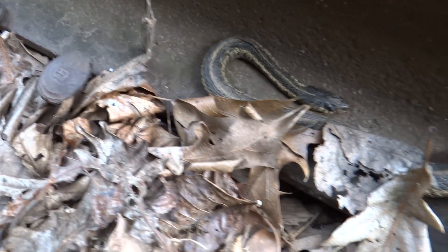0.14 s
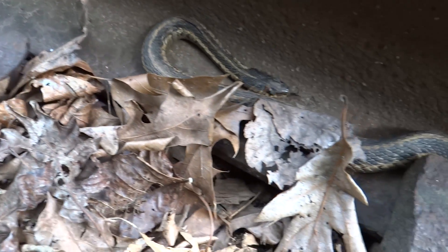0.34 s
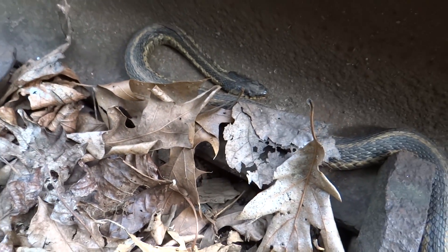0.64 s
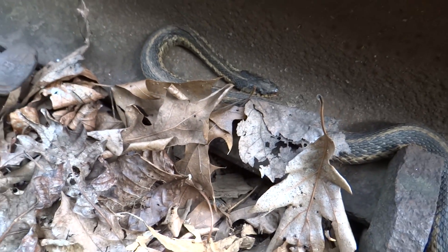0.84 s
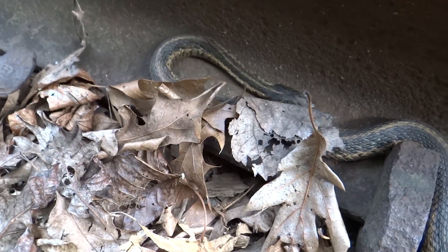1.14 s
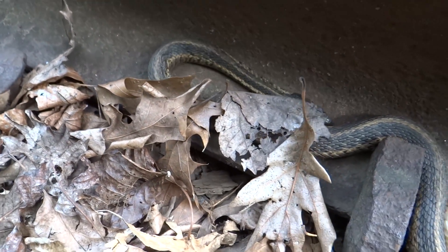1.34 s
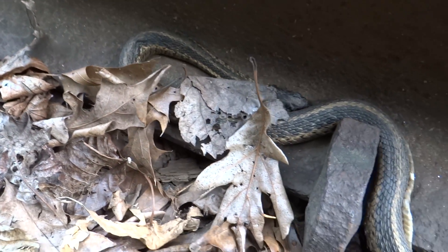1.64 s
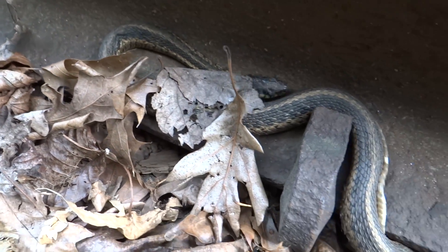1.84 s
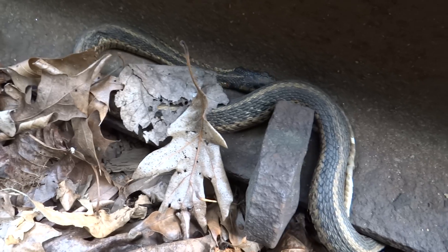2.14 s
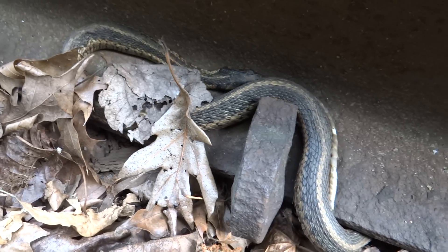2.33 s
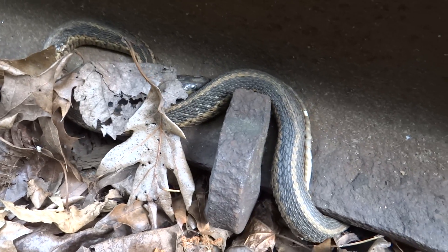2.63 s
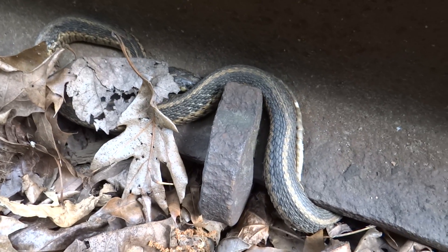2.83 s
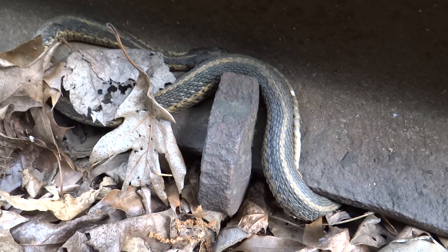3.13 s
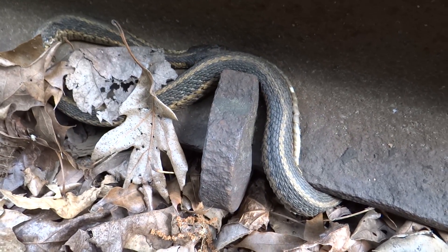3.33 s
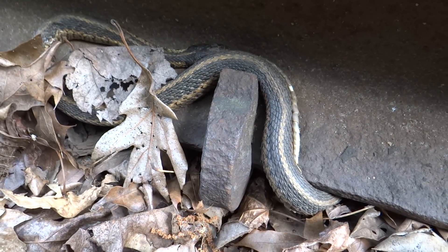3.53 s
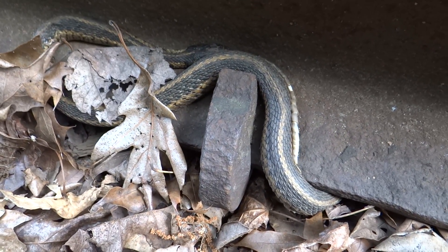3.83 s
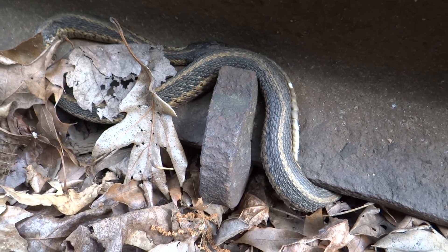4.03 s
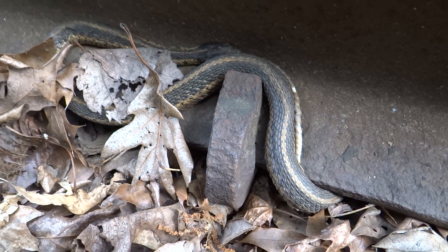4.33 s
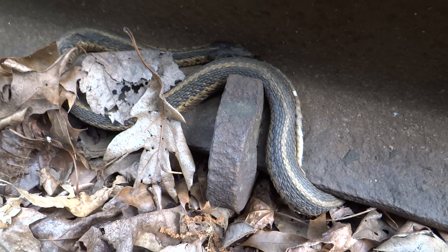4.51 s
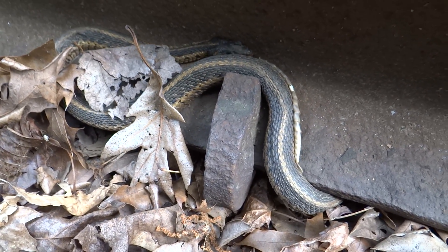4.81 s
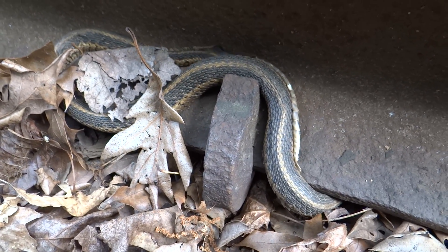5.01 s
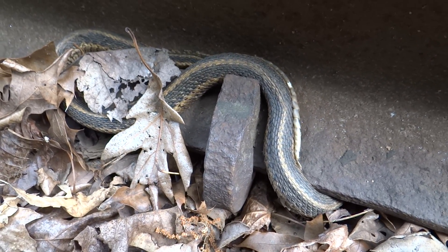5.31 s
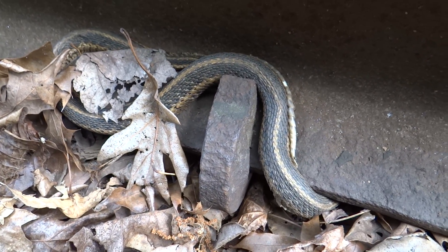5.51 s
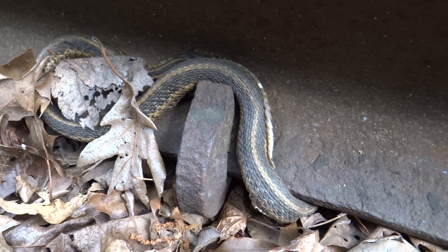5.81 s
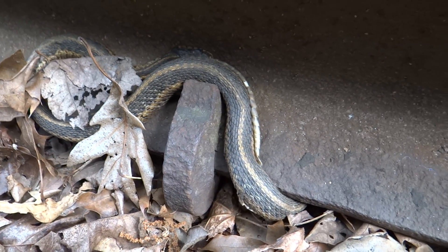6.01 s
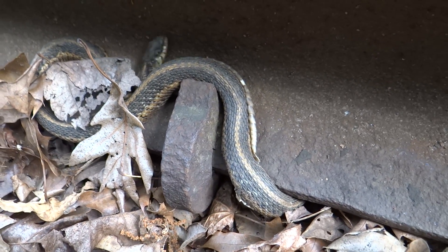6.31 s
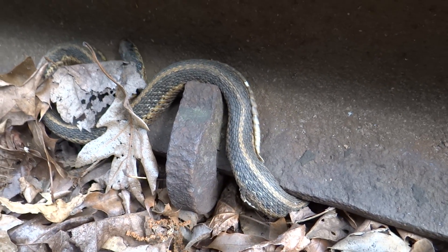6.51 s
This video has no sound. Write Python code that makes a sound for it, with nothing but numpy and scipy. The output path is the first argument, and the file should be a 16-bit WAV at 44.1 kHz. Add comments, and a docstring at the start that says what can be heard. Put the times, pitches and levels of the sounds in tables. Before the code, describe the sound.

A snake slides through dry fallen leaves close by, fine crackling and sharp leaf snaps growing busier, over a faint distant insect hum.

```python
"""Snake in dry oak leaves

Close to the microphone, outdoors, a snake slides through leaf litter beside a metal ledge.
Its scales rub out a fine crackle of tiny ringing slips; pressed leaves buckle, snap and flop down.
Far behind, narrow bands of noise make an insect chorus, and a wavering sine ends a bird's falling whistle.
Quiet outdoor air and a soft handling rumble, both shaped noise, lie underneath."""
import sys
import numpy as np
from scipy import signal
from scipy.fft import rfft, irfft, next_fast_len
from scipy.io import wavfile

SR = 44100
rng = np.random.default_rng(int(sys.argv[2]) if len(sys.argv) > 2 else 0)


def put_to_file(sound):
    """Save the sound as 16-bit audio at rate SR, in the file named by the first command-line argument."""
    columns = np.atleast_2d(sound).T  # one column per channel
    safe = np.clip(columns, -1, 1)
    whole_steps = np.round(safe * 32767)
    wavfile.write(sys.argv[1], SR, whole_steps.astype(np.int16))


N = 293485

# where the leaves are stirred, as seen by the microphone pair: (time [s], left minus right [dB])
STIR_PLACE = [(0, -2.5), (2.5, 1.5), (3.3, 0), (4.4, -5.5), (5.2, -2.5), (5.55, -5.5), (6.05, 0), (6.65, 1)]
BODY_PAN_SHARE = 0.56  # rustle and flops take this share of the side difference, nearer the middle


def from_db(db):
    """Decibels to gain."""
    return 10 ** (np.asarray(db) / 20)


def rms_one(x):
    """Scale to unit rms."""
    return x / np.sqrt(np.mean(x ** 2) + 1e-20)


def in_time(rows):
    """Interpolate each column of a time curve at every sample."""
    times_s, *columns = np.transpose(rows)
    return [np.interp(np.arange(N) / SR, times_s, column) for column in columns]


def drift(rate_hz):
    """Slow random wandering with spread 1: noise through two equal low-pass poles."""
    step = 40  # samples between computed points
    pole = np.exp(-2 * np.pi * rate_hz * step / SR)
    noise = rng.standard_normal(N // step + 2002)
    slow = signal.lfilter([1], [1, -2 * pole, pole * pole], noise)
    slow = rms_one(slow[2000:])  # the filter has settled by here
    return np.interp(np.arange(N) / step, np.arange(len(slow)), slow)


def band(x, low_hz, high_hz, order=2):
    """Causal Butterworth band-pass."""
    edges = np.clip([low_hz, high_hz], [10, 20], [.4 * SR, .45 * SR])
    sos = signal.butter(order, edges, "band", fs=SR, output="sos")
    return signal.sosfilt(sos, x + 1e-18)


def resonance(x, hz, width_hz):
    """Two-pole resonance with gain 1 at its peak."""
    r = np.exp(-np.pi * width_hz / SR)
    zeros = np.array([1, 0, -1]) * (1 - r * r) / 2
    poles = [1, -2 * r * np.cos(2 * np.pi * hz / SR), r * r]
    return signal.lfilter(zeros, poles, x + 1e-18)


def coloured(x, colour):
    """Weight a sound by a smooth spectral curve, then scale to rms 1."""
    size = next_fast_len(N + SR // 10)
    hz, db = np.transpose(colour)
    bins_hz = np.arange(size // 2 + 1) * SR / size
    gain = from_db(np.interp(np.log(bins_hz + 1), np.log(hz), db))
    return rms_one(irfft(rfft(x, size) * gain, size)[..., :N])


def panned(x, pan_db):
    """Share a level difference between left and right."""
    return x * from_db(np.array([[.5], [-.5]]) * pan_db)


def wide_noise(side_db, count=N):
    """Noise that is nearly the same at two close microphones."""
    mid, side = rng.standard_normal((2, count))
    return mid + from_db(side_db) * np.array([[1], [-1]]) * side


def add(track, s, sound):
    """Mix a short sound into a track at a time in seconds."""
    at = int(max(s, 0) * SR)
    track[:, at:at + sound.shape[-1]] += sound[..., :N - at]


def envelope(s, length_s, attack_s, release_s):
    """Rise linearly up to a time, hold, then die away by 20 dB in each release time."""
    t = np.arange(N) / SR
    rise = np.clip(1 + (t - s) / attack_s, 0, 1)
    return rise * 10 ** -np.clip((t - s - length_s) / release_s, 0, 10)


def effort(moves, attack_s, release_s, rest_db):
    """Gain of a run of movements; overlapping ones add in power over a faint steady stir."""
    power = sum((from_db(db) * envelope(s, length_s, attack_s, release_s)) ** 2
                for s, length_s, db in moves)
    return np.sqrt(power + from_db(rest_db) ** 2)


def crackle(per_s, size_db, clump_db, quality, low_hz, high_hz, count=28):
    """Tiny slips come in clumps; each rings one patch of leaf for a few cycles."""
    born = rng.random(N) < per_s * from_db(clump_db * drift(25)) / SR
    sizes = from_db(size_db * np.minimum(rng.exponential(1, N), 4))
    slips = born * sizes * rng.choice([-1, 1], N)
    patch = rng.integers(0, count, N)
    pitches = np.geomspace(low_hz, min(high_hz, .45 * SR), count)
    return rms_one(sum(resonance(slips * (patch == k), hz, hz / quality)
                       for k, hz in enumerate(pitches)))


def rustle():
    """Scales scrape finely and brightly; dragging is smoother, crumpling coarser and lower."""
    # the snake pushes forward and its scales rub the leaves: (time [s], length [s], level [dB])
    pushes = [(0, 0.34, -50), (.96, 0.87, -49), (1.1, .18, -42.5), (1.39, 0.055, -46), (1.88, 0.54, -48),
              (2.51, .1, -44), (2.82, 0.038, -46.5), (2.99, 0.27, -46.5), (4.45, 2.2, -50.5),
              (6.035, 0.13, -34), (6.207, .008, -33.5), (6.258, 0.013, -35), (6.6, .05, -46)]
    # spectrum of the rubbing: (frequency [Hz], relative density [dB])
    slide_colour = [(1500, -27), (3000, 1), (3800, 7), (4700, -1), (5600, -3.5), (6800, 0), (8600, 4.5),
                    (11300, 2.5), (12500, -3), (14300, -6), (16000, -4.5)]
    scrape = crackle(per_s=3500, size_db=4.0, clump_db=5.0, quality=8.9, low_hz=3010, high_hz=15260)
    scrape = coloured(scrape, slide_colour)
    scrape = scrape * effort(pushes, attack_s=0.023, release_s=0.044, rest_db=-65)

    # its weight crumples leaves: (time [s], length [s], level [dB])
    presses = [(4.36, 0.233, -45.5), (4.72, 0.14, -43.5), (5.2, 1.4, -49), (5.36, 0.23, -45),
               (6.035, 0.23, -39.5), (6.13, 0.025, -36), (6.4, 0.079, -49)]
    # spectrum of the crumpling: (frequency [Hz], relative density [dB])
    crush_colour = [(100, 2), (280, -13.5), (700, -1), (1500, -2), (2200, -2.5), (3100, -3.5), (4000, -4.5),
                    (4700, -15.5), (6000, -4), (9000, -16), (16000, -33)]
    crumple = crackle(per_s=4000, size_db=3.0, clump_db=3, quality=4.4, low_hz=301.5, high_hz=7050)
    crumple = coloured(crumple, crush_colour)
    crumple = crumple * effort(presses, attack_s=0.015, release_s=0.033, rest_db=-50)

    # scale edges catch on a leaf's rim and scratch very finely: (time [s], length [s], level [dB])
    scratches = [(2.0, .01, -52), (3.91, .015, -63), (4.12, 0.057, -54), (4.29, .04, -49),
                 (4.45, .37, -55.5), (5.11, 0.027, -53), (5.4, 0.23, -52)]
    sizzle = crackle(per_s=1500, size_db=5.0, clump_db=5, quality=7.3,
                     low_hz=13900, high_hz=16200, count=5)
    sizzle = sizzle * effort(scratches, attack_s=0.033, release_s=.08, rest_db=-75)

    # belly dragging over one flat leaf: (time [s], level [dB])
    drag_curve = [(0, -52), (.7, -56.5), (1.22, -49.5), (1.7, -54), (2.2, -46), (2.5, -53.5), (2.9, -54),
                  (3.3, -73), (6.65, -52)]
    drag = crackle(per_s=16000, size_db=6.5, clump_db=2.0, quality=7.6,
                   low_hz=5000, high_hz=5630, count=4)
    drag = drag * from_db(in_time(drag_curve)[0])

    return panned(scrape + crumple + sizzle + drag, BODY_PAN_SHARE * in_time(STIR_PLACE)[0])


def snaps(tear_db, tear_t60, shiver_s, ring_db, ring_quality):
    """A buckling leaf kicks, tears for a moment, then shivers; its size sets the pitch."""
    # single leaves buckle: (time [s], level [dB], centre [Hz], half width [octaves])
    buckles = [(0.0299, -33, 7200, 0.64), (0.0904, -33, 5400, 0.77), (1.149, -37, 4200, .7),
               (1.226, -34, 7000, 1), (1.258, -25.5, 8360, 0.33), (1.272, -32, 9500, 0.53),
               (1.889, -36, 9000, 0.59), (2.0058, -34.5, 9500, .7), (2.255, -31, 9700, 0.43),
               (2.3287, -37, 9500, 0.48), (2.3837, -33, 10100, 0.41), (2.5125, -24.5, 3710, 0.46),
               (2.514, -25, 8500, 1.6), (2.517, -28, 5400, 1.1), (2.5344, -29.5, 5600, 1.3),
               (3.099, -31.5, 7900, 1.16), (3.2246, -30.5, 3450, 0.45), (3.2245, -27.5, 10500, 1.9),
               (4.363, -29.5, 2070, 0.61), (4.368, -29, 2500, .7), (4.3847, -22, 2400, 1),
               (4.3914, -32, 2000, .7), (4.4565, -18.5, 3100, 0.97), (4.4952, -33, 2200, .7),
               (4.5783, -27, 2290, 0.86), (4.614, -29, 4730, 1.1), (4.6356, -29, 5600, 0.5),
               (4.7243, -29, 7800, 1.5), (4.7351, -27, 2660, 0.98), (5.271, -22, 3100, 0.66),
               (5.2741, -16, 3000, 0.61), (5.277, -20, 5000, 1.3), (5.3608, -32.5, 3560, 0.64),
               (5.3935, -31.5, 3400, .7), (5.406, -32, 3000, 1), (5.5429, -23.5, 3340, 0.8),
               (5.553, -31, 2300, 1), (5.5949, -26, 2580, .7), (5.985, -30, 3680, 1.1),
               (6.04, -25.5, 7000, 1.3), (6.0434, -20, 8400, 0.63), (6.0535, -26, 8400, 1),
               (6.0774, -29, 5500, 1.6), (6.0964, -29, 6140, 0.92), (6.1233, -22.5, 3800, 1.2),
               (6.132, -35, 4630, 1.7), (6.1407, -25.5, 6100, 1.1), (6.1484, -20.5, 3340, 0.4),
               (6.164, -31, 4700, .9), (6.2052, -31, 7500, 0.88), (6.2103, -24.5, 8100, 0.54),
               (6.2456, -26, 5900, 1.46), (6.2667, -26.5, 5100, 1.2)]
    # resonances that leaves of this size share, and a broad dip around 4.3 kHz: (frequency [Hz], width [Hz],
    # lift or dip [dB])
    snap_modes = [(1840, 380, 2), (3100, 410, 1), (4300, 2900, -7.5), (5550, 620, 5), (8200, 490, -4.5),
                  (10100, 2000, 0.5)]
    typical_db = -28
    shiver_db, shiver_loss = -8, .1  # at the typical level; dB less per dB louder: hard snaps break cleanly
    splinter_db, splinter_db_per_octave = -14.5, 22  # at 1.5 octaves; wider breaks splinter more

    out = np.zeros((2, N))
    t = np.arange(SR // 25) / SR
    tear = from_db(tear_db - 60 * t / tear_t60)
    shiver = t * np.exp(-t / shiver_s)
    shiver /= np.linalg.norm(shiver)
    for s, db, hz, octaves in buckles:
        harder_db = db - typical_db
        roughness = tear + from_db(shiver_db - shiver_loss * harder_db) * shiver
        force = roughness * rng.standard_normal(len(t))
        force[0] = 1  # the kick
        # a leaf radiates only near its own pitch, with steep edges: filter twice
        half_width = 2 ** max(octaves, .1)
        low_hz, high_hz = hz / half_width, hz * half_width
        snap = band(band(force, low_hz, high_hz), low_hz, high_hz)
        snap += from_db(ring_db) * resonance(force, hz, hz / ring_quality)
        # the break splinters in the treble
        splinter_gain = from_db(splinter_db + splinter_db_per_octave * (octaves - 1.5))
        snap += splinter_gain * band(force, 4200, 16800)
        for mode_hz, width_hz, lift_db in snap_modes:
            snap = snap + (from_db(lift_db) - 1) * resonance(snap, mode_hz, width_hz)
        # bending waves cross the leaf at different speeds and smear the kick: three all-passes
        for bend_hz in np.minimum(hz * 2. ** np.array([-.5, 0, .5]), .4 * SR):
            snap = snap - 2 * resonance(snap, bend_hz, 2200)
        snap /= np.sqrt(np.mean(snap[:SR // 500] ** 2))  # rms 1 over the first 2 ms
        add(out, s, snap * from_db(db))
    return panned(out, in_time(STIR_PLACE)[0])


def flops(spread, rise_s):
    """A leaf pats the ground and pushes out a dull puff of air."""
    # whole leaves flop down: (time [s], peak level [dB], centre [Hz])
    pats = [(1.937, -35, 542), (4.388, -32, 437), (4.493, -27.5, 520), (4.5, -32, 290), (4.549, -30, 750),
            (4.58, -25.5, 660), (4.734, -26, 660), (4.748, -30.5, 620), (5.273, -29, 695),
            (5.526, -39, 270), (5.543, -33, 500), (6.04, -30.5, 650), (6.124, -25.5, 650),
            (6.147, -22, 560), (6.209, -26, 810), (6.262, -22, 625)]
    out = np.zeros((2, N))
    t = np.arange(SR // 15) / SR
    swell = t * np.exp(-t / rise_s)
    for s, db, hz in pats:
        puff = band(rng.standard_normal(len(t)) * swell, hz / spread, hz * spread)
        puff = band(puff, 170, 5300)
        add(out, s - rise_s, puff / np.abs(puff).max() * from_db(db))
    return panned(out, BODY_PAN_SHARE * in_time(STIR_PLACE)[0])


def litter(x, scatter_db, t60):
    """Neighbouring leaves and the ledge scatter the sound for a few ms, differently to each side."""
    t = np.arange(SR // 20) / SR
    echoes = rng.standard_normal((2, len(t))) * from_db(-60 * t / t60)
    echoes *= t > .001  # nothing returns within the first millisecond
    echoes /= np.linalg.norm(echoes, axis=1, keepdims=True)
    return x + from_db(scatter_db) * signal.fftconvolve(x, echoes, axes=1)[:, :N]


def bird(waver_hz, flutter_db):
    """A whistle sinks towards a steady pitch and fades, fluttering on its way through the trees."""
    start_hz, sag_hz, sag_s = 3580, 244, 0.11
    start_db, fade_db_per_s = -41, 50
    t = np.arange(N) / SR
    hz = start_hz - sag_hz * (1 - np.exp(-t / sag_s))
    loudness = from_db(start_db - fade_db_per_s * t + flutter_db * drift(60))
    loudness = loudness * envelope(s=0, length_s=0.17, attack_s=.09, release_s=.09)
    phase = 2 * np.pi * np.cumsum(hz + waver_hz * drift(400)) / SR
    return np.sqrt(2) * loudness * np.sin(phase)


def chorus():
    """Countless far insects blur into one narrow, restless region of overlapping noise bands."""
    # insect bands: (centre [Hz], width [Hz], level [dB])
    insect_bands = [(1187, 155, -52.5), (1317, 158, -46), (1325.5, 92, -47.5), (1437, 180, -53)]
    return sum(from_db(db) * rms_one(band(wide_noise(side_db=-14.5), hz - width / 2, hz + width / 2))
               for hz, width, db in insect_bands)


def outdoor_air():
    """Steady outdoor air: shaped noise, nearly alike at both microphones."""
    # spectrum of the air: (frequency [Hz], relative density [dB])
    air_colour = [(25, -29), (60, -31.5), (100, -10.5), (230, -8), (450, -4.5), (900, 2), (1900, 1),
                  (3700, 0.5), (4700, -5.5), (5700, -4), (6900, -15), (9500, -12.5), (11500, -21),
                  (14000, -33), (16000, -37)]
    return from_db(-45) * coloured(wide_noise(side_db=-12), air_colour)


def handling():
    """The moving hand rumbles softly through the microphone's case: a low band of noise."""
    # hand moving the microphone: (time [s], level [dB])
    hand_curve = [(0, -71), (1.55, -72), (1.8, -84), (4, -92), (6.65, -89)]
    rumble = rms_one(band(rng.standard_normal(N), 86, 118))
    return from_db(in_time(hand_curve)[0]) * rumble


def scene():
    """Leaves close by, scattered by the litter, over bird, insects, air and handling."""
    leaves = rustle() + flops(spread=2.4, rise_s=0.00253)
    leaves = leaves + snaps(tear_db=-21.0, tear_t60=0.0038, shiver_s=0.0018, ring_db=-3, ring_quality=19)
    near = litter(leaves, scatter_db=-12.0, t60=0.014)
    far = bird(waver_hz=45, flutter_db=5.0) + chorus() + outdoor_air()
    return near + far + handling()


def record(dry, hollow_hz=13450, hollow_quality=4, hollow_db=-17, cutoff_hz=16000):
    """The microphone port has a hollow in the high treble; a steep low-pass cuts the top."""
    hollowed = signal.lfilter(*signal.iirnotch(hollow_hz, hollow_quality, fs=SR), dry)
    heard = hollowed + from_db(hollow_db) * (dry - hollowed)  # limits the depth of the notch
    low_pass = signal.ellip(12, .2, 80, cutoff_hz, fs=SR, output="sos")
    return signal.sosfilt(low_pass, heard)


dry = scene()
out = record(dry)
put_to_file(out)
```